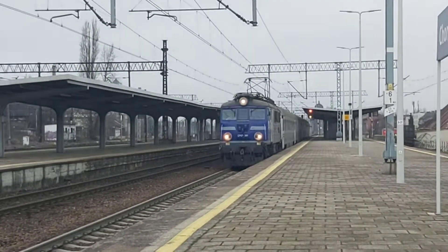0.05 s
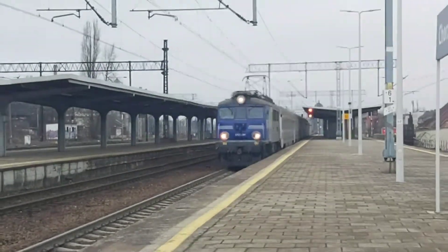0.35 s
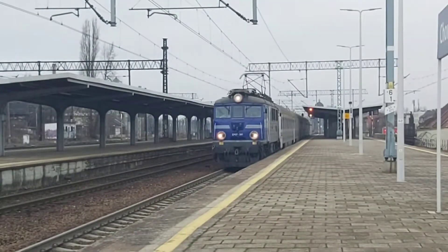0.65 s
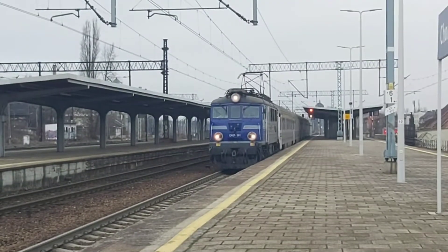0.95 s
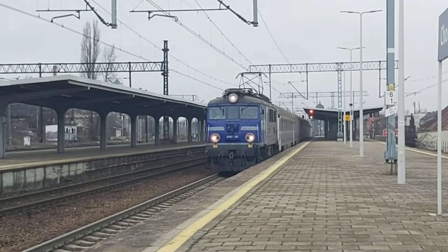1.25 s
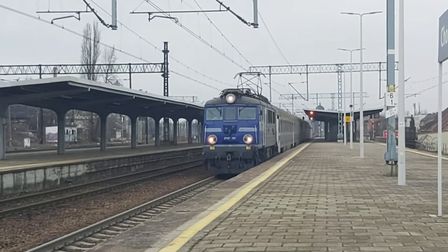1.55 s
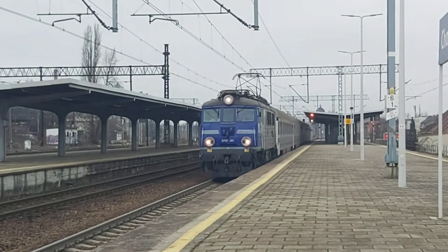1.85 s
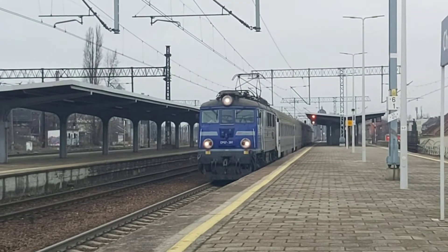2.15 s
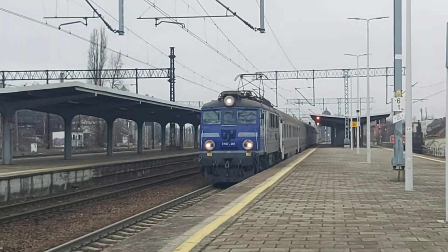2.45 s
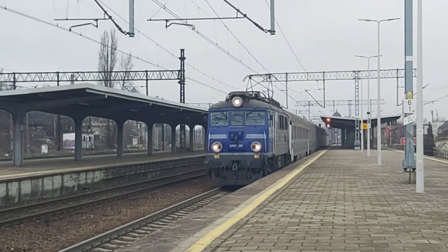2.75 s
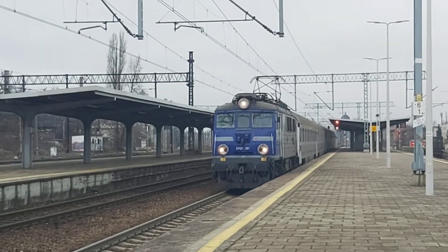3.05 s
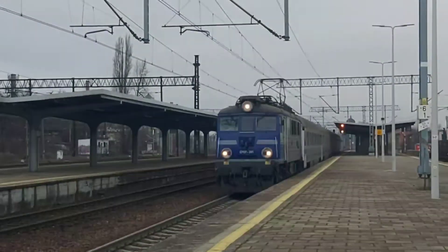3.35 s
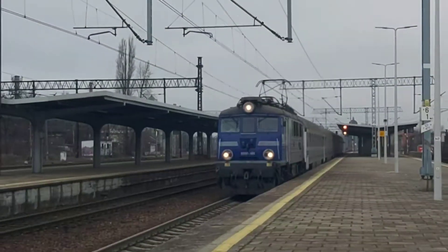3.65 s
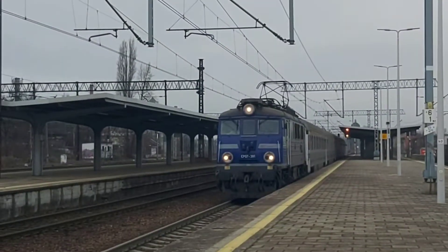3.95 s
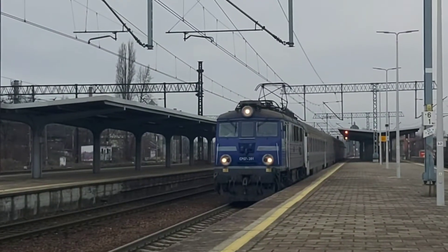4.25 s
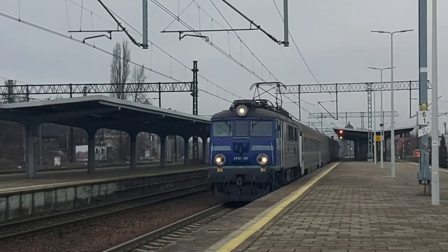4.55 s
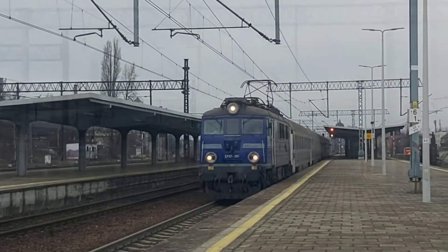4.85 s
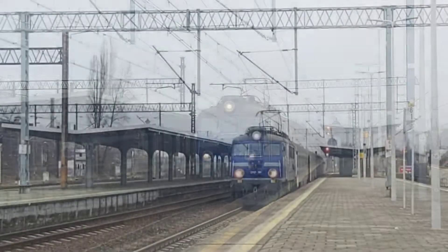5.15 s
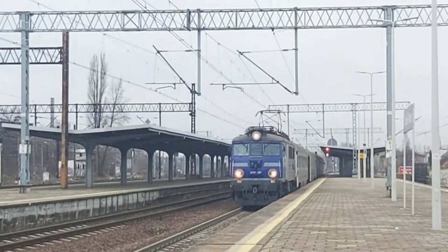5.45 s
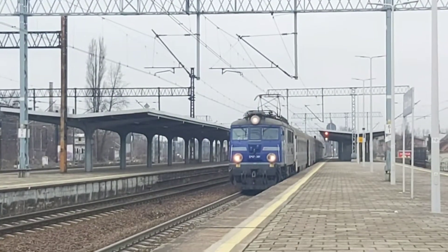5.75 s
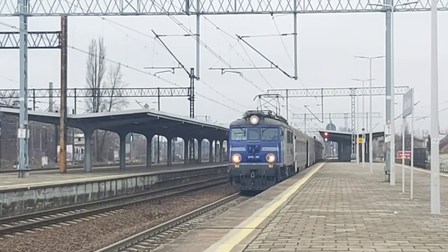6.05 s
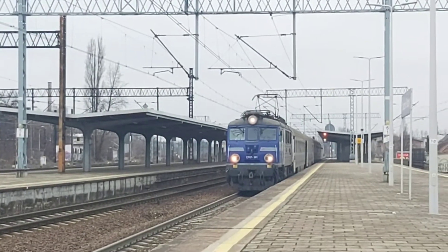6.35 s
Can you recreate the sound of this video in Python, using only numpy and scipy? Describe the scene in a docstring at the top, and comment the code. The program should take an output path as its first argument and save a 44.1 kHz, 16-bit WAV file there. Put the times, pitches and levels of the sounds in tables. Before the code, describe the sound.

Heard from an open station platform, a slowing train gives a low rumble and a hoarse brake grind beneath a shrill, wavering wheel squeal. A thin metallic sizzle grows as it nears, and brief high squeaks break out. Then the squeal and rumble drop away, and gusts of wind buffet the microphone over a faint distant wash and a soft, gently rising hum.

```python
"""An electric train brakes into an open station: wheels rumble, brake blocks grind, and stick-slip makes
several wheels squeal near 4.5 kHz, their tones scattered by the coaches and platform roofs.
Short high squeaks cluster just before the squeal dies away. The braking fades out and gives way to
a soft rising hum and wind buffeting the microphone, whose left port is dull."""
import sys
import numpy as np
from scipy import signal
from scipy.fft import rfft, irfft, next_fast_len
from scipy.io import wavfile
from scipy.ndimage import uniform_filter1d, map_coordinates

SR = 44100
rng = np.random.default_rng(int(sys.argv[2]) if len(sys.argv) > 2 else 0)


def master_out(mix):
    """Clip the mix to full scale and print it as 16-bit PCM to the path in sys.argv[1]."""
    frames = np.transpose(np.atleast_2d(mix))
    ceiling = np.clip(frames, -1, 1)
    pcm = np.round(ceiling * 32767).astype(np.int16)
    wavfile.write(sys.argv[1], SR, pcm)


N = 286640
TIME = np.arange(N) / SR
EASE_S, QUIET_S = 4.66, 5.25  # brake noise starts to ease; from here the whole braking scene fades out
SETTLE_S = 1.6  # time constant of tones that start sharp


def amp(db):
    """Decibels to gain."""
    return 10 ** (np.asarray(db) / 20)


def unit(x):
    """Scale to rms 1."""
    return x / np.sqrt(np.mean(np.abs(x) ** 2) + 1e-20)


def along(points, hz):
    """(frequency [Hz], value) points read on a log axis."""
    knots_hz, values = np.transpose(points)
    return np.interp(np.log(hz + 1), np.log(knots_hz + 1), values)


def curve(points):
    """(time [s], value) points read at every sample."""
    return np.interp(TIME, *np.transpose(points))


def until(end_s, t60_s):
    """Gain 1 up to end_s, then a decay."""
    return amp(-60 * np.maximum(TIME - end_s, 0) / t60_s)


def between(start_s, end_s, rise_s, t60_s):
    """Gain 1 from start_s to end_s; swells 60 dB in rise_s before, decays after."""
    return amp(-60 * np.maximum(start_s - TIME, 0) / rise_s) * until(end_s, t60_s)


def wobble(rate_hz):
    """Smooth random curve, rate_hz knots a second."""
    coarse_s = np.linspace(0, N / SR, 4096)
    knots = rng.standard_normal(1024)
    return np.interp(TIME, coarse_s, map_coordinates(knots, [coarse_s * rate_hz], mode="wrap"))


def pan(db):
    """Left and right gains for an L-R level difference."""
    gain = np.array([amp(db / 2), amp(-db / 2)]).reshape(2, -1)
    return gain / np.sqrt(np.mean(gain ** 2, axis=0))


def filtered(x, response):
    """Apply a frequency response to x."""
    size = next_fast_len(N + 8192)
    return irfft(rfft(x, size) * response(np.fft.rfftfreq(size, 1 / SR)), size)[..., :N]


def noise(spectrum):
    """Mono coloured noise, rms 1."""
    return unit(filtered(rng.standard_normal(N), lambda hz: amp(along(spectrum, hz))))


def wide(spectrum, patchy_db):
    """Stereo noise with drifting patches of gain: alike in the bass, mostly unrelated in the treble."""
    # left-right likeness: (frequency [Hz], correlation [0-1])
    likeness = [(60, 0.9), (150, 1), (330, 1), (600, 0.34), (1200, 0.22), (4000, 0.23)]
    # stereo balance: (frequency [Hz], L-R [dB])
    balance = [(60, -5), (110, -3), (300, -3.5), (700, -3), (1300, -1), (2200, -2), (2900, -8.5),
               (3700, -17), (4400, 9.5)]

    def mid_side(hz):
        angle = np.arccos(np.clip(along(likeness, hz), -1, 1)) / 2
        return amp(along(spectrum, hz)) * [np.cos(angle), np.sin(angle)]

    bins = signal.stft(rng.standard_normal((2, N)), nperseg=512)[2]
    patches = uniform_filter1d(rng.standard_normal(bins.shape[1:]), size=4, axis=0)
    patches = uniform_filter1d(patches, size=20, axis=1)
    pair = signal.istft(bins * amp(patchy_db * unit(patches)), nperseg=512)[1][:, :N]
    mid, side = filtered(pair, mid_side)
    stereo = np.array([mid + side, mid - side]) / np.std(mid)
    return filtered(stereo, lambda hz: pan(along(balance, hz)))


def scatter(width_hz, skirt):
    """Many moving echo paths sum to a fading complex gain, different at each port."""
    count = 8192
    offset_hz = np.fft.fftfreq(count, N / SR / count)
    paths = rng.standard_normal((2, count)) + 1j * rng.standard_normal((2, count))
    gains = unit(np.fft.ifft(paths / np.sqrt(1 + np.abs(offset_hz / width_hz) ** skirt)))
    return np.array([np.interp(TIME, np.linspace(0, N / SR, count), gain) for gain in gains])


def tone(hz, width_hz, echo_share, skirt=4):
    """Ringing stereo tone, rms 1: a wavering direct part plus scattered echoes."""
    phase = 2 * np.pi * np.cumsum(hz + np.zeros(N)) / SR
    direct = unit(amp(wobble(14))) * np.cos(phase + .7 * np.array([wobble(4), wobble(4)]))
    echoes = np.real(np.exp(1j * phase) * scatter(width_hz, skirt))
    return np.sqrt(2) * (np.sqrt(1 - echo_share) * direct + np.sqrt(echo_share) * echoes)


def slowing(power, stop_s=8.9):
    """Gain as a power of the train's speed, which falls evenly toward zero at stop_s."""
    return np.maximum(1 - TIME / stop_s, .01) ** power


def rolling():
    """Wheels shake the track and coach bodies; each layer falls at its own rate as the train slows."""
    # deep thumps from the track: (time [s], level [dB])
    jolt_peaks = [(.92, -29), (2.27, -30)]
    # a coach body booms: (time [s], level [dB])
    boom_peaks = [(.22, -24.5), (1.52, -31), (3.45, -42)]
    # rolling noise spectra, low to high: (frequency [Hz], density [dB])
    thump_spectrum = [(20, -32), (35, -16), (50, -3.5), (68, 4.5), (85, -12), (140, -60), (300, -120)]
    rumble_spectrum = [(20, -36.5), (30, -25.5), (42, -10), (55, -7.5), (70, 8), (100, 7.5), (118, -5),
                       (150, -22), (400, -120)]
    boom_spectrum = [(40, -73), (80, -22.5), (115, 2), (160, 4), (190, -1.5), (250, -52), (600, -120)]
    body_spectrum = [(60, -72), (120, -55), (180, -3), (230, 1), (290, 3), (340, -4), (400, -18.5),
                     (600, -61), (1500, -120)]
    roar_spectrum = [(250, -14.5), (400, 1), (600, -0.5), (900, -0.5), (1200, -3), (1500, -5.5), (2000, -6),
                     (2500, -24), (3200, -25), (9000, -120)]
    jolts = sum(amp(db) * between(s, s, rise_s=.44, t60_s=.9) for s, db in jolt_peaks)
    booms = sum(amp(db) * between(s, s, rise_s=2.5, t60_s=1.55) for s, db in boom_peaks)
    thump = (amp(-37.5) * slowing(.25) + jolts) * wide(thump_spectrum, patchy_db=2)
    thump *= until(4.3, t60_s=8.9)
    rumble = amp(-25.5) * slowing(2.15) * wide(rumble_spectrum, patchy_db=.5)
    boom = (amp(-34) * slowing(1.82) + booms) * wide(boom_spectrum, patchy_db=.5)
    body = amp(-33) * slowing(.52) * wide(body_spectrum, patchy_db=1.05) * until(4.64, t60_s=5.3)
    roar = amp(-37.5) * slowing(.89) * wide(roar_spectrum, patchy_db=1.64) * until(4.77, t60_s=6)
    return (thump + rumble + boom + body + roar) * until(QUIET_S, t60_s=.92)


def dense_modes(spacing_hz, depth_db):
    """Response of countless close wheel modes: a comb of random heights."""
    heights = rng.standard_normal(2048)
    return lambda hz: amp(depth_db * map_coordinates(heights, [hz / spacing_hz], mode="wrap"))


def bite(start_db, growth_db_per_s=1.75):
    """Gain of the high ringing: grows as the wheels near, flares when the blocks grab, then dies."""
    # the blocks grip harder: (start [s], length [s], boost [dB])
    grabs = [(2.92, 0.024, 2), (3.27, .22, 2.2)]
    grab_db = sum(db * between(s, s + length_s, rise_s=.3, t60_s=.5) for s, length_s, db in grabs)
    growth_db = growth_db_per_s * np.minimum(TIME, EASE_S)
    return amp(start_db + growth_db + grab_db) * until(4.58, t60_s=1.6) * until(4.88, t60_s=.55)


def brake_blocks():
    """Blocks grind on the treads and set off hoarse resonances."""
    # block friction and its treble: (frequency [Hz], density [dB])
    rub_spectrum = [(1200, -16), (2000, -1), (2900, -4), (3800, -1), (4300, 3), (5000, -2), (5700, 4),
                    (6400, 1), (7200, -12.5), (9500, -29), (16000, -79)]
    sizzle_spectrum = [(3000, -90), (6000, -30), (7400, -16), (8100, -7), (9400, -5), (10200, -13),
                       (11300, -4), (12300, -2), (13400, 4), (14100, 1), (14700, -2), (15800, -3)]
    rub = amp(-39.5) * wide(rub_spectrum, patchy_db=1.2)
    modes = dense_modes(spacing_hz=50, depth_db=3.3)
    sizzle_gain = bite(start_db=-48) * amp(1.3 * wobble(7.6))
    sizzle = unit(filtered(np.array([noise(sizzle_spectrum), noise(sizzle_spectrum)]), modes))
    rasp_hz = 3470 + 161.2 * np.exp(-TIME / SETTLE_S)
    rasp = amp(-43) * slowing(.8) * tone(rasp_hz, width_hz=52, echo_share=.92) * until(EASE_S, t60_s=2.5)
    groan = amp(-45.5) * tone(2226, width_hz=54, echo_share=.89)
    groan *= between(2.66, 4.7, rise_s=1.1, t60_s=4.2)
    grind = (rub + rasp) * until(EASE_S, t60_s=2.6) + groan
    return grind * until(QUIET_S, t60_s=.84) + sizzle_gain * sizzle


def wheel_squeal():
    """Stick-slip locks each of three wheels onto one mode; the loudest also sounds its harmonics."""
    # lead tone arriving as echoes: (time [s], power share [0-1])
    echo_shares = [(0, 0.68), (2.1, 0.38), (3.7, 0.35), (4.7, 0.92)]
    # drift between the ports: (time [s], L-R [dB])
    drift = [(.6, -2.5), (1.6, -4.5), (2, 3), (2.45, -7), (3.6, -1), (4.2, 7), (4.7, 1.5)]
    lock_s, swell_db_per_s, sink_db_per_s = 2.32, 4.5, .53
    level_db = -21 - swell_db_per_s * np.maximum(lock_s - TIME, 0)
    level_db -= sink_db_per_s * np.maximum(TIME - lock_s, 0)
    lead_hz = 4487 - 4.4 * TIME
    lead = tone(lead_hz, width_hz=33.2, echo_share=curve(echo_shares), skirt=7.7)
    # the second wheel gives way as its note nears the lead's
    unsettled = np.exp(-TIME / SETTLE_S)
    second = amp(-13 + 8.7 * unsettled) * tone(4499 + 64 * unsettled, width_hz=6, echo_share=.39)
    # faster wheels scrape a stronger fringe around the tone
    fringe = amp(-2.5) * slowing(3.6) * tone(lead_hz, width_hz=80, echo_share=1, skirt=6)
    wheels = amp(level_db) * until(EASE_S, t60_s=2.43) * pan(curve(drift)) * (lead + second + fringe)
    harmonic_2 = amp(-60 + 3.18 * TIME) * tone(2 * lead_hz, width_hz=28, echo_share=.84)
    harmonic_2 *= until(EASE_S, t60_s=1.06)
    harmonic_3 = bite(start_db=-42.5) * tone(3 * lead_hz, width_hz=42, echo_share=.4, skirt=2.4)
    # the third wheel joins late and thin, turning rough as it flares
    flare = between(4.3, 4.67, rise_s=1.7, t60_s=.7)
    third_gain = np.hypot(amp(-41.5) * until(4.9, t60_s=1.7), amp(-31.8) * flare)
    third = third_gain * tone(4750, width_hz=20, echo_share=.1 + .5 * flare)
    third *= between(3.97, QUIET_S, rise_s=.3, t60_s=3)
    release = until(QUIET_S, t60_s=1.05) * until(5.48, t60_s=.48)
    return (wheels + third + harmonic_2) * release + harmonic_3


def rim_ring():
    """The strongest upper wheel modes ring with the sizzle, each swelling and sinking on its own."""
    # upper wheel modes: (frequency [Hz], level [dB])
    modes = [(5459, -71), (5720, -71), (6164, -67), (7210, -77), (7930, -63), (8344, -75), (9491, -69),
             (9679, -74), (10610, -77), (11079, -71), (11364, -60), (11773, -68), (11849, -69),
             (12435, -64), (12812, -68), (12936, -62), (13329, -57), (13814, -67), (14072, -63),
             (14653, -73), (15235, -66), (15692, -69)]
    ring = sum(amp(db + 3.5 * wobble(5)) * tone(hz, width_hz=16, echo_share=.55) for hz, db in modes)
    return bite(start_db=1) * ring


def squeaks():
    """Modes catch as the blocks' grip changes; high ones get a little more gain, long ones ring on."""
    # squeaks: (start [s], length [s], frequency [Hz], width [Hz], level before treble boost [dB])
    catches = [(1.8, .55, 11364, 20, -53), (1.95, .07, 6200, 25, -58), (1.9, 2.85, 3290, 45, -54),
               (2.8, 1.9, 1225, 20, -58), (2.88, .1, 6164, 30, -58), (3.38, .17, 7930, 20, -56),
               (4.05, .95, 1025, 28, -51.5), (4.05, .15, 12940, 30, -52), (4.1, .9, 2040, 60, -54),
               (4.3, .06, 6480, 25, -59), (4.33, .08, 11860, 25, -52), (4.42, .17, 12812, 25, -53),
               (4.52, .32, 7580, 55, -52), (4.53, .07, 15330, 90, -45), (4.77, .07, 11460, 70, -50),
               (4.76, .1, 15330, 30, -50), (4.87, .06, 8516, 20, -57), (4.93, .07, 14230, 30, -58),
               (4.95, .33, 4648, 12, -56), (5.03, .18, 1925, 30, -53)]
    out = np.zeros((2, N))
    for start_s, length_s, hz, width_hz, db in catches:
        ring_s = np.interp(length_s, [.07, .3], [.28, .6])
        treble_boost_db = np.interp(hz, [4000, 7000], [3, 6])
        envelope = between(start_s, start_s + length_s, rise_s=.12, t60_s=ring_s)
        out += amp(db + treble_boost_db) * tone(hz, width_hz, echo_share=.62) * envelope
    return out * until(QUIET_S, t60_s=1.3)


def wind_buffet():
    """Gusts thud on a microphone port over a steady low rumble."""
    # thuds: (start [s], end [s], level [dB])
    thuds = [(5.51, 5.56, -27), (5.66, 5.74, -30.5), (5.85, 5.928, -37), (6.418, 6.5, -35.5)]
    # buffeting: (frequency [Hz], density [dB])
    spectrum = [(20, -17), (35, -14), (65, -4), (97, 2), (150, -10.5), (270, -16.5), (400, -19), (600, -31),
                (3000, -120)]
    power = amp(-37) ** 2
    for start_s, end_s, db in thuds:
        power += (amp(db) * between(start_s, end_s, rise_s=.47, t60_s=.63)) ** 2
    return np.sqrt(power) * amp(1.2 * wobble(18)) * noise(spectrum)


def wind_rush(swell):
    """Wind rushes, flaps and fizzes past a port, its level fluttering."""
    # low, middle and treble wind: (frequency [Hz], density [dB])
    rush_spectrum = [(30, -32), (130, -18), (220, -19), (270, -5.5), (320, 3.5), (440, 4.5), (600, -6),
                     (900, -23), (5000, -120)]
    gust_spectrum = [(300, -19), (550, 0), (750, -1.5), (1000, -7), (1400, -13.5), (2200, -22), (4000, -59),
                     (9000, -120)]
    fizz_spectrum = [(3000, -15), (6000, 3), (9000, 0), (12500, 0), (15800, -3)]
    # short flaps: (time [s], relative level [dB])
    flap_peaks = [(5.44, -47), (5.523, -32), (5.596, -30), (5.669, -37), (5.709, -29.5), (5.803, -30),
                  (5.947, -33.5), (5.995, -49), (6.073, -38), (6.346, -31)]
    flaps = sum(amp(db - 3) * between(s + .0044, s + .0083, rise_s=.013, t60_s=.036)
                for s, db in flap_peaks)
    rush = amp(-36.5) * swell ** .85 * noise(rush_spectrum)
    gust = np.hypot(amp(-44.3) * swell ** 1.15, flaps) * noise(gust_spectrum)
    fizz = (amp(-82) + amp(-77.5) * between(5.42, 5.76, rise_s=1.5, t60_s=.8)) * noise(fizz_spectrum)
    flutter = amp(1.7 * wobble(45))
    return flutter * (rush + gust + fizz)


def distant_wash(swell):
    """Soft far-off noise, unrelated at the two ports, lifting slightly with the gust."""
    # distant noise: (frequency [Hz], density [dB])
    spectrum = [(150, -15), (400, 3.5), (900, 5), (1500, 0.5), (2000, -1), (2900, -14), (4400, -14),
                (6000, -14.5), (7300, -26.5), (10000, -54)]
    return amp(-49) * swell ** .21 * np.array([noise(spectrum), noise(spectrum)])


def rising_hum():
    """A rising hum, far to the left."""
    full_s, glide_hz_per_s = 5.82, 37
    hz = 217.7 + glide_hz_per_s * (TIME - full_s)
    envelope = amp(-41) * between(full_s, 6.1, rise_s=1.6, t60_s=7.5)
    return envelope * tone(hz, width_hz=14, echo_share=.37) * pan(24)


def scene():
    """Braking on the open platform, then wind and hum."""
    braking = rolling() + brake_blocks() + wheel_squeal() + rim_ring() + squeaks()
    swell = 1 + amp(6.5) * between(6.43, 6.48, rise_s=.5, t60_s=1.2)  # one stronger gust
    wind = np.array([wind_buffet(), wind_rush(swell)])  # left, right
    wind_and_hum = wind + distant_wash(swell) + rising_hum()
    return braking + wind_and_hum * between(5.38, N / SR - .005, rise_s=1.8, t60_s=.008)


def record(dry):
    """The left port hears later and loses treble; both add faint hiss and end at the band limit."""
    # dull left port: (frequency [Hz], gain [dB])
    left_port = [(4800, 0.5), (5600, -13.5), (6400, -22.5), (7400, -44), (9000, -23), (13000, -21.5),
                 (15500, -32)]
    lag_s, hiss_db, top_hz = .00042, -82, 15880
    left = filtered(dry[0], lambda hz: amp(along(left_port, hz)) * np.exp(-2j * np.pi * hz * lag_s))
    pair = np.array([left, dry[1]]) + amp(hiss_db) * rng.standard_normal((2, N))
    return filtered(pair, lambda hz: hz < top_hz)


dry = scene()
out = record(dry)
master_out(out)
```